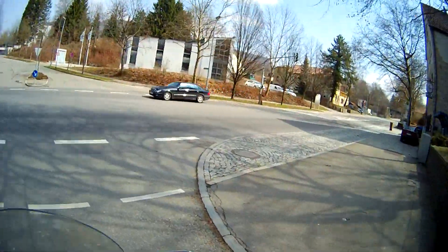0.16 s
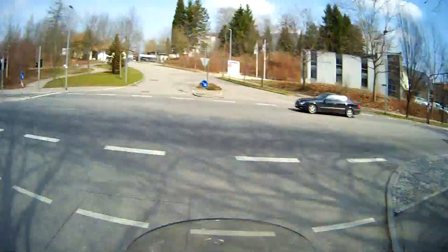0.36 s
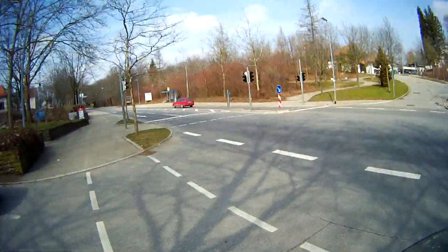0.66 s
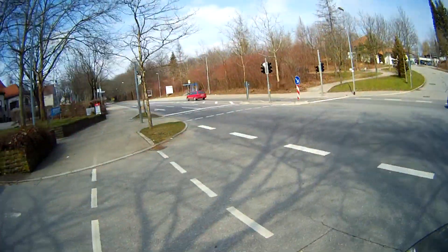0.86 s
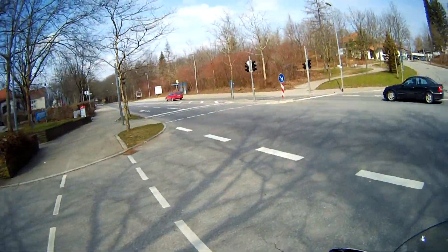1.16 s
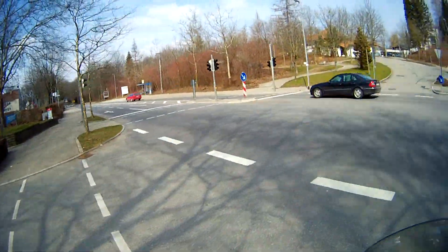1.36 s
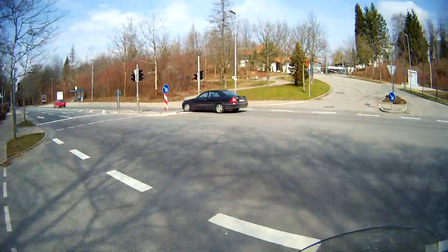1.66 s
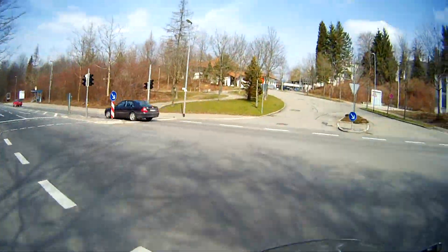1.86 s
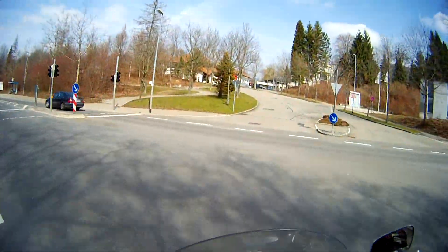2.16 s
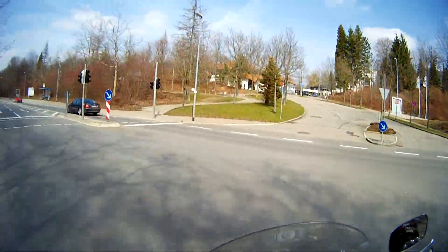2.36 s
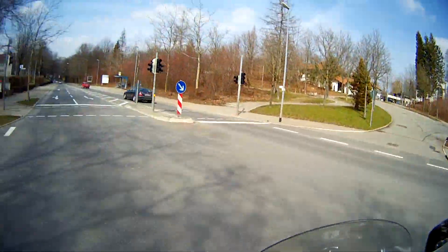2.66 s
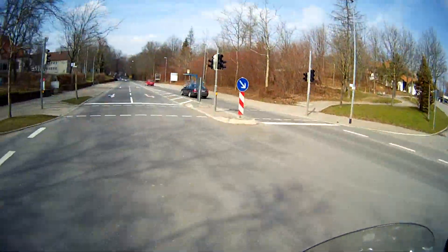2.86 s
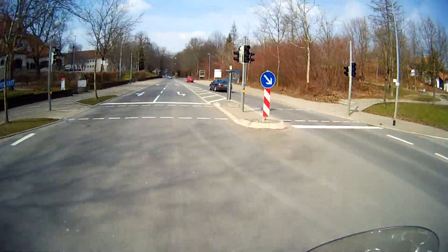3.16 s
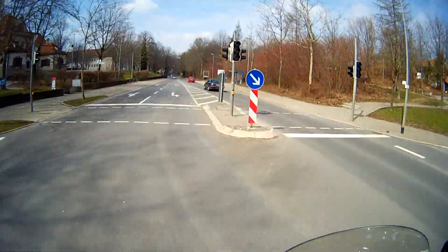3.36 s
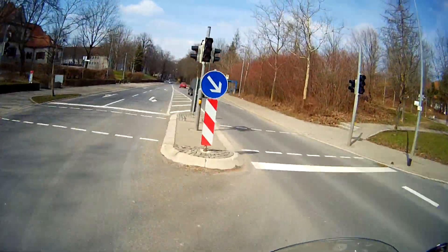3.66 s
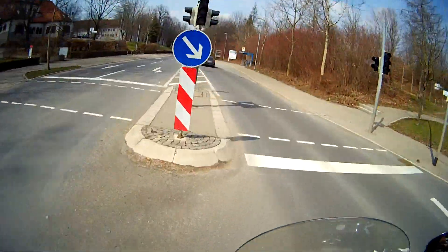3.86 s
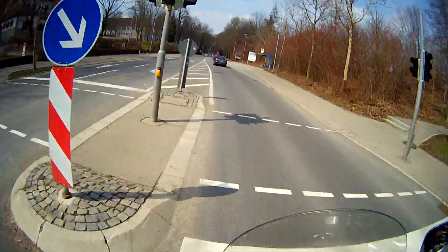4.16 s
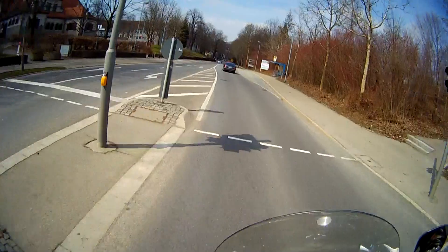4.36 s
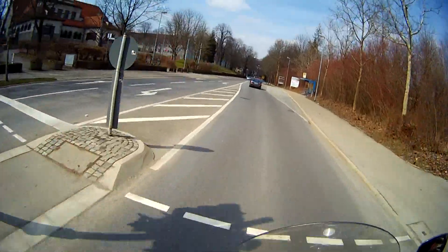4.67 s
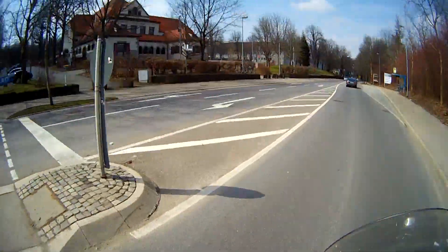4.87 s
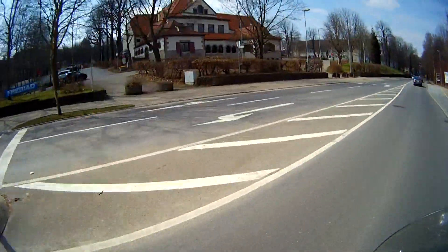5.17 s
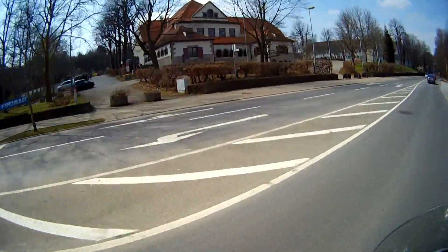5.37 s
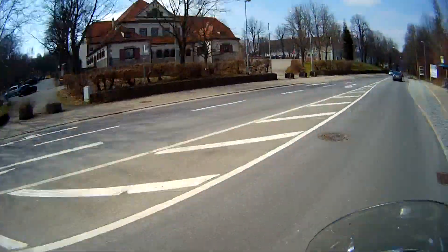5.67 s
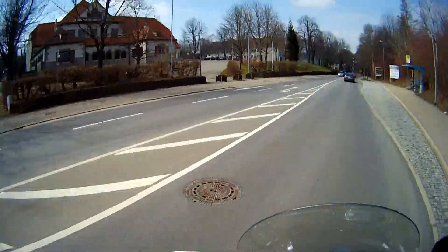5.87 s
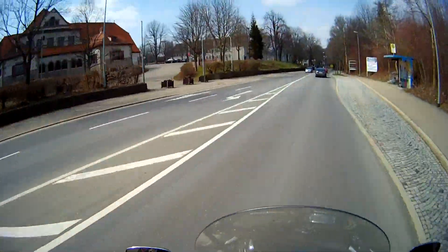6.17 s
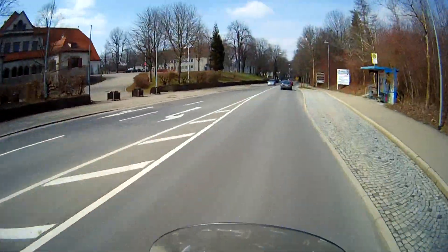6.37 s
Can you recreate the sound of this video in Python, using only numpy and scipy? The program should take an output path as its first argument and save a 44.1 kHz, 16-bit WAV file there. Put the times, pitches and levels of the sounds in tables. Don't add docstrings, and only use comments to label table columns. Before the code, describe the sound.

Heard from a rider's helmet on an open road. From 0 to 0.7 s a V-twin motorcycle idles in deep, uneven thumps, in nearly still air, with a few small wind pops around 0.45 and 0.6 s. At 0.8 s it blips, catches briefly as the clutch bites near 1.07 s, and pulls hard, pitch rising until 1.5 s, with barking exhaust and metallic valve clatter. Revs sink by 1.8 s as wind suddenly roars in; a strong burst hits at 2.3 s and ragged, hissing gusts follow, overloading the microphone. The engine climbs again, but from 2.4 s everything fades, dulling after 2.9 s, to a whisper by 3.8 s. Very faintly beneath, the first upshift drops the pitch around 3.8 s, the engine climbs through a long pull in steady headwind, and a second upshift comes near 6.3 s, ending at about 6.5 s.

```python
import sys
import numpy as np
from scipy import signal
from scipy.fft import rfft, irfft, next_fast_len
from scipy.io import wavfile
from scipy.ndimage import uniform_filter1d, map_coordinates

SR = 44100
rng = np.random.default_rng(int(sys.argv[2]) if len(sys.argv) > 2 else 0)


def file_out(sig):
    cols = np.atleast_2d(sig).T
    lim = np.clip(cols, -1, 1)
    pcm = np.round(lim * 32767).astype(np.int16)
    wavfile.write(sys.argv[1], SR, pcm)


def boost(x):
    u = np.asarray(x, float) / 20
    return 10 ** u


N = 287091
T = np.arange(N) / SR

# t/s, speed (0 standing, 1 full), sideways buffeting over roar/dB, steady roar/dB
AIR = [(0, 0.16, -7, -49.5), (.8, 0.014, -2.5, -46), (1.7, 0.14, 4.5, -41.5), (1.76, 0.16, 12, -39.5),
       (1.9, 0.53, 3.5, -15.5), (2.15, 0.63, 7.5, -20.5), (2.6, 0.12, 8, -24.5), (2.86, 0.34, -2, -19.5),
       (2.95, 0.15, -6.5, -24.5), (3.4, 0.23, -7.5, -28), (3.6, 0.24, -2.5, -28.5), (3.8, 0.51, -3, -19),
       (5.1, 0.69, -1.5, -17.5), (5.8, 0.91, -6, -20), (6.28, 0.9, -7, -18), (6.33, 0.78, 3.5, -12),
       (6.5, .93, -2.5, -15)]
# t/s, length/s, roar/dB, hiss over roar/dB
TURN_GUSTS = [(0.434, .02, -30.5, -24), (0.46, .04, -31.5, -24), (0.607, 0.013, -27, -26),
              (1.803, 0.07, -24, -20), (1.851, 0.21, -19, -15), (2.073, 0.089, -24.5, -10.5),
              (2.168, .026, -17, -24), (2.189, 0.037, -20, -9.5), (2.215, .029, -22, -19),
              (2.243, 0.041, -17.5, -13), (2.295, 0.014, -5.5, -20), (2.397, 0.011, -23.5, -2),
              (2.405, 0.0046, -37.5, -19), (2.43, 0.027, -14.5, -8.5), (2.461, .013, -13.5, 1.5),
              (2.472, 0.065, -14, -10.5), (2.523, .132, -15, -11), (2.662, .062, -14, -4),
              (2.724, 0.14, -8.5, -2), (2.898, 0.025, -20.5, -11), (3.254, .02, -25, -5),
              (3.044, 0.016, -31.5, 3.5), (3.058, 0.2, -20.5, -1), (3.263, 0.072, -20.5, 1),
              (3.401, 0.014, -22, -3.5), (3.453, 0.018, -19.5, -10), (3.564, .017, -21.5, -0.5),
              (3.576, 0.023, -38.5, 6.5), (3.615, .019, -22, -12), (3.629, 0.073, -14.5, 0.5)]
# t/s, length/s, roar/dB
STRAIGHT_GUSTS = [(3.739, .248, -8), (4.035, 0.037, -30), (4.068, 0.021, -14), (4.086, 0.012, -19.5),
                  (4.101, 0.03, -8.5), (4.146, .035, -26.5), (4.181, 0.014, -14), (4.259, 0.1, -11),
                  (4.4, .171, -10), (4.592, .027, -11), (4.681, .119, -8.5), (4.816, .036, -8),
                  (4.91, 0.018, -8.5), (4.978, 0.024, -15), (4.938, .04, -22.5), (5.067, .042, -12),
                  (5.265, 0.02, -10), (5.331, 0.019, -20), (5.385, .197, -11), (5.609, .009, -8.5),
                  (5.687, .09, -14.5), (5.777, 0.2, -14.5), (5.866, 0.031, -31.5), (5.885, 0.014, -14),
                  (5.936, 0.019, -15.5), (5.958, 0.059, -28), (6.073, .024, -10.5), (6.097, .021, -20),
                  (6.118, .197, -10), (6.33, 0.17, -8)]
# t/s, peak/dB
POPS = [
    (.4435, -20),
    (.4465, -20),
    (.4535, -9),
    (.46, -18),
    (.617, -19),
]
POP_S = .0004
# f/Hz, level/dB per Hz
SWELL = [(12, -22.5), (30, 5), (60, -5), (100, -23), (200, -49.5)]
BUFFET = [(40, -23), (120, -1), (250, -2.5), (420, -6.5), (750, -12), (1200, -17.5), (2000, -52)]
PUFF = [(120, -20), (220, 0), (450, -1), (800, -7), (1300, -18), (2500, -55)]
ROAR = [(120, -50.5), (280, -1.5), (450, 0), (800, 2.5), (1400, 0.5), (2200, -10.5), (3500, -31),
        (8000, -62.5)]
HISS = [(500, -8), (1500, 9), (2200, 8), (4600, -2.5), (6500, -9.5), (9000, -18.5), (13500, -28),
        (15500, -34.5)]
SHRILL = [(700, -28.5), (1800, -1.5), (3000, 0.5), (5000, 2), (7000, -6.5), (10000, -9.5), (15500, -15.5)]
HISS_DB, HISS_SIDEWAYS, HISS_FAST_DB = -10.5, -0.76, 11
HEAVE_DB, HEAVE_FAST_DB = -45, 24
SIZZLE_HZ, SIZZLE_DB, SIZZLE_GROWS = 6300, -10.5, 0.47

# t/s, four-stroke cycles per s
CRANK = [(0.0, 8.74), (0.74, 9.18), (0.9, 12.18), (1.0, 14.38), (1.14, 16.48), (1.31, 19.77), (1.51, 20.46),
         (1.83, 14.13), (2.09, 15.48), (2.45, 15.78), (2.97, 18.92), (3.3, 21.15), (3.54, 22.38),
         (4.04, 15.93), (4.45, 17.92), (5.65, 25.23), (6.09, 25.88), (6.52, 15.74)]
START, V_GAP = -.038, .43
# t/s, exhaust level/dB before the fade
EXHAUST = [(0, -23.5), (.55, -19.5), (.74, -20), (.82, -16), (1.03, -12), (1.23, -11.5), (1.81, -12.5),
           (2.16, -8.5), (2.54, -9.5), (2.8, -10), (3.48, -7.5), (3.64, -14), (3.85, -12.5), (5.2, -8.5),
           (6.04, -11.5), (6.2, -16.5), (6.34, -11.5), (6.51, -19)]
# f/Hz, ring/s, growth with revs, share in front cylinder, share in rear
PIPE = [
    (90, .019, -.15, 1.35, .8),
    (138, .013, 2.5, .25, .42),
    (275, .012, 4.5, .09, .07),
    (184, .0135, 1, .75, 1.45),
    (590, .025, 2.5, .055, .045),
]
# t/s, loose rumble share/dB, valve crack/dB, extra clatter/dB
PHASES = [
    (0, -11, -60, 0),
    (.81, -11.5, -36, 2.5),
    (1.06, -12, -55, -4),
    (1.18, -19, -44, 0),
    (1.8, -12.5, -46, 1),
    (2.8, -24, -45, -2),
    (3.6, -4.5, -45, -5),
    (3.95, -19, -43, -5),
    (6.16, -2.5, -43, -5),
]
# t/s, half length/s, loss/dB
STUMBLES = [
    (0.688, .04, 4),
    (1.067, .04, 9.5),
    (2.71, .04, 1),
    (3.819, .16, 8),
    (6.279, .05, 16),
]
# f/Hz, level/dB per Hz
RUMBLE = [(15, -48.5), (40, -4.5), (65, -2), (130, -7.5), (200, -3), (300, -40), (500, -58.5)]
BARK = [(150, -34.5), (300, 7), (420, -5), (580, 1.5), (860, -7), (1650, -6), (2500, -42), (5000, -60)]
CLATTER = [(800, -37), (1900, -5), (3800, -4), (5400, -2), (6700, -6), (9000, -13.5), (13500, -21.5),
           (15500, -34.5)]
CRACK = [(250, -34), (550, 8.5), (1500, -3.5), (3000, -14.5), (6000, -34), (12000, -23)]
BARK_DB, BARK_GROWS, CLATTER_DB, CLATTER_GROWS = -31.5, 1.46, -31.5, 1.325
OPEN_ROAD_S, THINS_DB_PER_S = 4.8, 5

# f/Hz, gain/dB
CAPSULE = [(3000, -0.5), (4500, -1), (5500, 0), (6700, -4.5), (9000, -8.5), (15000, -8)]
# f/Hz, gain/dB, phase/radians
WIDEN = [(39.3, -5, .17), (150, -2.9, 0.8), (300, 2.5, 0.69), (420, 7, 1.3), (600, 12, .4), (1200, 7, 0.05),
         (4000, 4.5, 0.59), (15000, 4.5, 0.39)]
# f/Hz, level/dB per Hz
GRIT = [(2000, -38), (5000, -13.5), (8000, -13.5), (11000, -19), (13500, -43.5), (15000, -63)]
# t/s, gain/dB
FADE = [(2.42, 0), (2.52, -4), (2.8, -6), (3, -10), (3.3, -15.5), (3.5, -21.5), (3.6, -27), (3.7, -38),
        (3.78, -45)]
DULL_S, DULL_HZ = (2.87, 3.6), 1700


def unit(x):
    return x / np.sqrt(np.mean(x ** 2) + 1e-20)


def curves(rows):
    s, *cols = np.transpose(rows)
    return [np.interp(T, s, c) for c in cols]


def along(points, hz, column=1):
    table = np.transpose(points)
    return np.interp(np.log(hz + 1), np.log(table[0] + 1), table[column])


def filtered(x, response):
    m = next_fast_len(N + 8192)
    return irfft(rfft(x, m) * response(np.fft.rfftfreq(m, 1 / SR)), m)[..., :N]


def noise(spectrum, lumps=1):
    return unit(filtered(lumps * rng.standard_normal(N), lambda hz: boost(along(spectrum, hz))))


def wobble(rate):
    return map_coordinates(rng.standard_normal(int(N * rate / SR) + 4), [T * rate])


def gusting(steady_db, shrill_db):
    roar_db = steady_db + 0.84 * wobble(35)
    shrill_db = shrill_db.copy()
    for s, length, db, *shrill in TURN_GUSTS + STRAIGHT_GUSTS:
        during = slice(round(s * SR), round((s + length) * SR))
        roar_db[during] = db
        if shrill:
            shrill_db[during] = shrill[0]
    return uniform_filter1d(roar_db, size=130), uniform_filter1d(roar_db + shrill_db, size=130)


def popping():
    pops = np.zeros(N)
    for s, db in POPS:
        u = ((T - s) / POP_S) ** 2
        pops += boost(db) * (1 - u) * np.exp(-.5 * u)
    return pops


def wind():
    air, sideways_db, steady_db = curves(AIR)
    air = np.clip(air, 0, 1)
    roar_db, hiss_db = gusting(steady_db, HISS_DB + HISS_SIDEWAYS * sideways_db + HISS_FAST_DB * air)
    eddies = 0.7 * wobble(45) + 2.3 * wobble(160)
    buffet = boost(sideways_db - 1.5) * noise(BUFFET, boost(eddies))

    moving = np.clip(air / .2, 0, 1)
    roar = moving * noise(ROAR, boost(.7 * eddies + 4.4 * wobble(700)))
    roar += (1 - moving) * 1.44 * noise(PUFF, boost(0.87 * wobble(300)))

    hiss = np.sqrt(1 - air ** 2) * noise(HISS, boost(1.4 * eddies + 4.2 * wobble(900)))
    hiss += air * noise(SHRILL, boost(0.75 * eddies + 5 * wobble(1200)))
    sizzle = boost(SIZZLE_GROWS * np.clip(hiss_db - SIZZLE_DB, None, 0))
    hiss = hiss - (1 - sizzle) * filtered(hiss, lambda hz: hz > SIZZLE_HZ)

    gust_db = uniform_filter1d(roar_db - steady_db, size=2205)
    heave = boost(HEAVE_DB + HEAVE_FAST_DB * air + gust_db / 2) * noise(SWELL, boost(1.1 * wobble(12)))
    return popping() + heave + boost(roar_db + 0.2) * (roar + buffet) + boost(hiss_db + 3.0) * hiss


def firings(speed, rise_s, heat, bite, scatter_db, jitter_s):
    turns = START + np.cumsum(speed) / SR
    span = np.arange(-600, 2000)
    thump, puffs = np.zeros(N + 2600), np.zeros(N + 2600)
    for cylinder, offset in enumerate((0, V_GAP)):
        at = np.nonzero(np.diff(np.floor(turns - offset)))[0]
        chance = rng.standard_normal((len(at), 3))
        pace = speed[at, None] / 20
        u = span / SR - jitter_s * chance[:, :1]
        size = boost(scatter_db * chance[:, 1:2]) / np.sqrt(pace)
        index = (at[:, None] + span - span[0]).ravel()
        for hz, ring_s, grows, *share in PIPE:
            width = np.where(u < 0, rise_s, ring_s * pace ** -.2)
            shape = size * pace ** (bite * grows) * np.exp(-np.abs(u / width) ** 2.6)
            ring = -share[cylinder] * np.cos(2 * np.pi * hz * pace ** heat * u)
            thump += np.bincount(index, (shape * ring).ravel(), len(thump))
            if grows == 1:
                puffs += np.bincount(index, shape.ravel(), len(thump))
    thump = filtered(thump[-span[0]:], lambda hz: 1 / (1 + (40 / (hz + 1)) ** 4))
    return unit(thump), unit(puffs[-span[0]:][:N])


def engine():
    speed, = curves(CRANK)
    thump, puffs = firings(speed, rise_s=.0045, heat=.47, bite=.8, scatter_db=.6, jitter_s=.0002)
    start, loose_db, crack_db, load_db = np.transpose(PHASES)
    phase = np.searchsorted(start, T, "right") - 1
    loose = boost(uniform_filter1d(loose_db[phase], size=4410))
    crack_db = uniform_filter1d(crack_db[phase], size=2205)
    load_db = uniform_filter1d(load_db[phase], size=2205)
    stumble_db = sum(db * np.clip(1 - np.abs(T - s) / half, 0, 1) for s, half, db in STUMBLES)

    revs_db = 20 * np.log10(speed / 20)
    bark_db = BARK_DB + BARK_GROWS * revs_db
    thinning_db = THINS_DB_PER_S * np.clip(T - OPEN_ROAD_S, 0, None)
    clatter_db = CLATTER_DB + CLATTER_GROWS * revs_db + load_db - thinning_db

    low = np.sqrt(1 - loose ** 2) * thump + loose * noise(RUMBLE)
    exhaust = boost(curves(EXHAUST)[0] - stumble_db) * low
    bark = boost(bark_db) * noise(BARK, (2.5 + puffs) * boost(0.51 * wobble(60)))
    clatter = boost(clatter_db) * noise(CLATTER, (3 + puffs) * boost(1.3 * wobble(90)))
    opening = np.clip(np.gradient(puffs), 0, None) ** 2
    crack = boost(crack_db) * noise(CRACK, opening)
    return exhaust + bark + clatter + crack


def scene():
    return np.tile(wind() + engine(), (2, 1))


def widened(mono):
    def response(hz):
        ratio = boost(along(WIDEN, hz)) * np.exp(1j * along(WIDEN, hz, column=2))
        return np.array([2 * ratio, 2 + 0 * hz]) / (1 + ratio)
    return filtered(mono, response)


def treble_dropouts(pair, ceiling_hz, wander_hz, spare_db):
    hz, t, z = signal.stft(pair, SR, nperseg=1024)
    top = np.abs(z[:, hz > 9000]).mean(axis=(0, 1))
    burst_db = 20 * np.log10(top / uniform_filter1d(top, size=25) + 1e-9)
    luck = rng.standard_normal((33, len(t) // 3 + 1)).repeat(16, 0).repeat(3, 1)
    dull = (t > DULL_S[0]) & (t < DULL_S[1])
    edge = ceiling_hz - DULL_HZ * dull + wander_hz * luck[:len(hz), :len(t)]
    keep = (hz[:, None] < edge) | (burst_db > spare_db)
    return signal.istft(z * keep, SR, nperseg=1024)[1][:, :N]


def low_pass(x):
    return signal.sosfilt(signal.butter(12, 15710, fs=SR, output="sos"), x)


def record(dry):
    mono = dry[0] / (1 + np.abs(dry[0] / 1.3) ** 5) ** (1 / 5)
    mono = filtered(mono, lambda hz: boost(along(CAPSULE, hz)))
    pair = widened(mono)
    treble = filtered(mono, lambda hz: hz > 3000)
    rough = boost([[3.5], [-1.5]]) * treble * rng.standard_normal((2, N))
    grit = filtered(rough, lambda hz: boost(along(GRIT, hz)))
    pair = treble_dropouts(pair + grit, ceiling_hz=13500, wander_hz=800, spare_db=4)
    fade = boost(curves(FADE)[0])
    pair = filtered(pair * fade, lambda hz: hz < 15700)
    offset = np.array([[-.007], [.05]]) * fade
    return low_pass(np.clip(pair + offset, -1, 1))


dry = scene()
out = record(dry)
file_out(out)
```